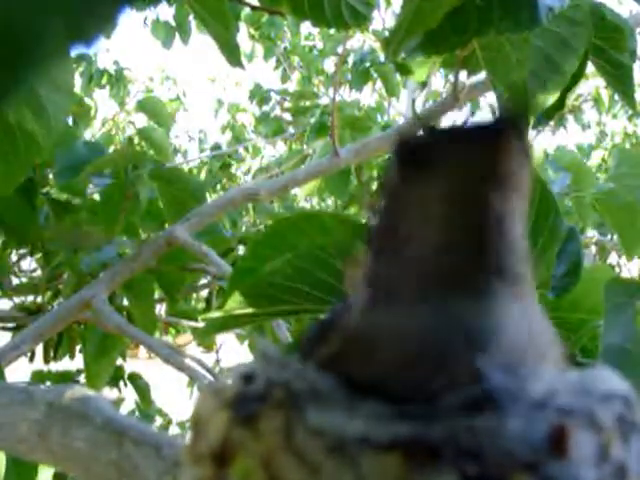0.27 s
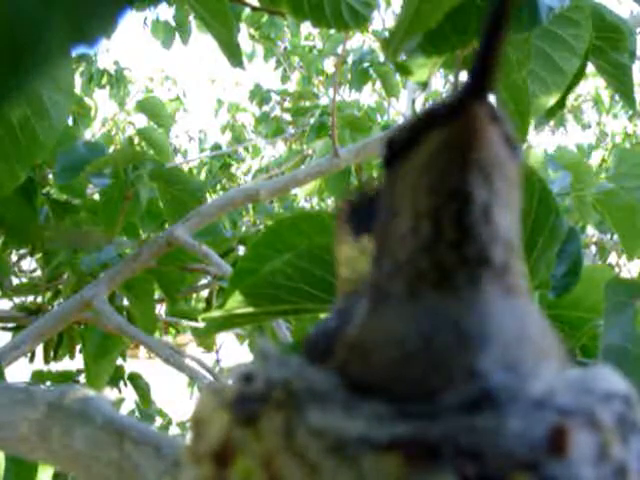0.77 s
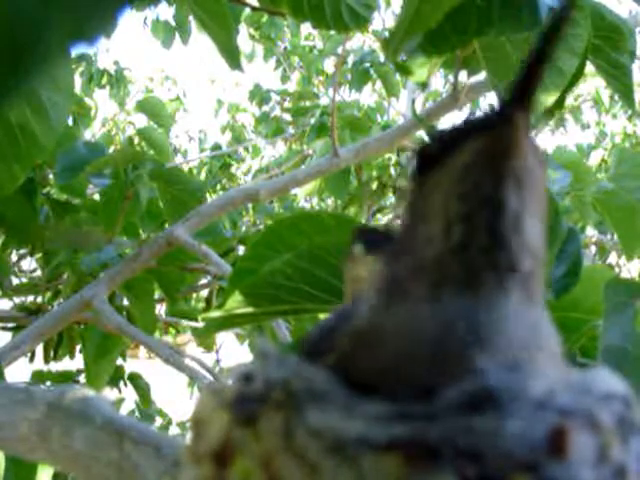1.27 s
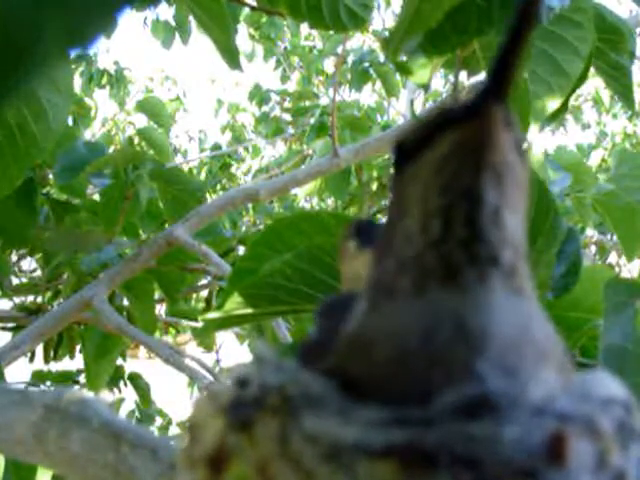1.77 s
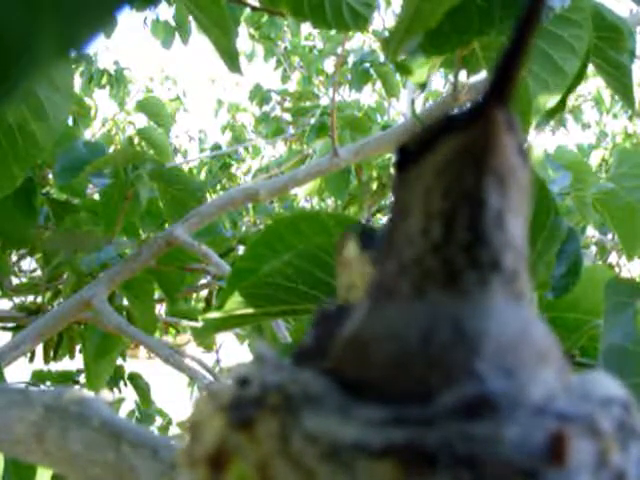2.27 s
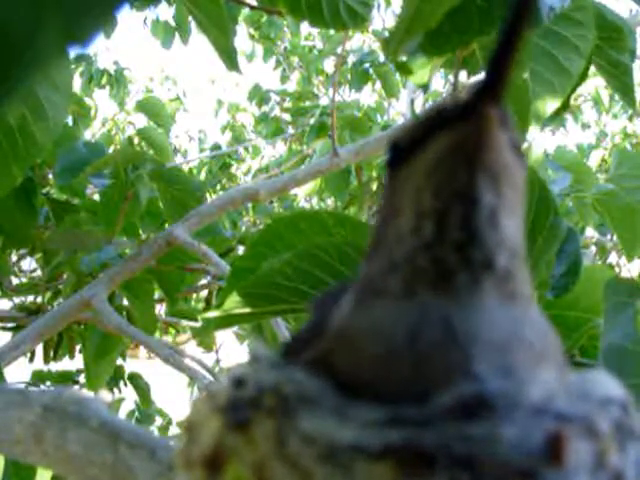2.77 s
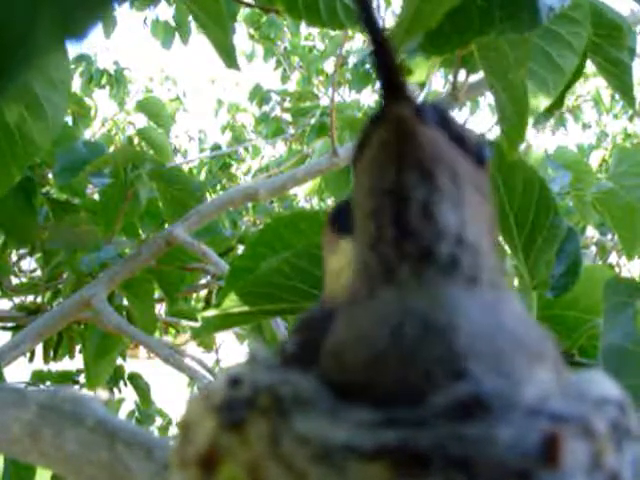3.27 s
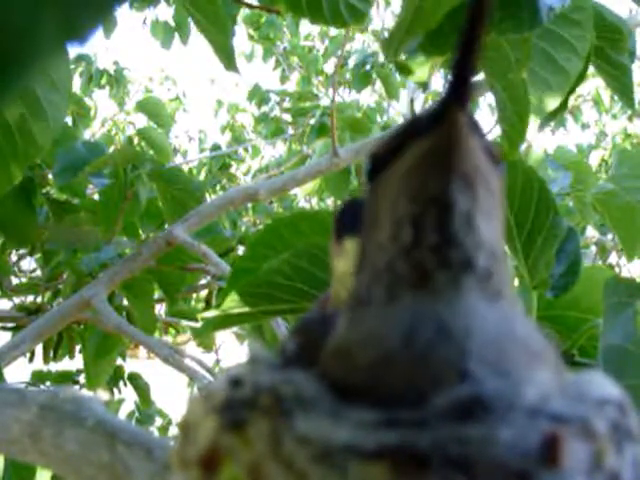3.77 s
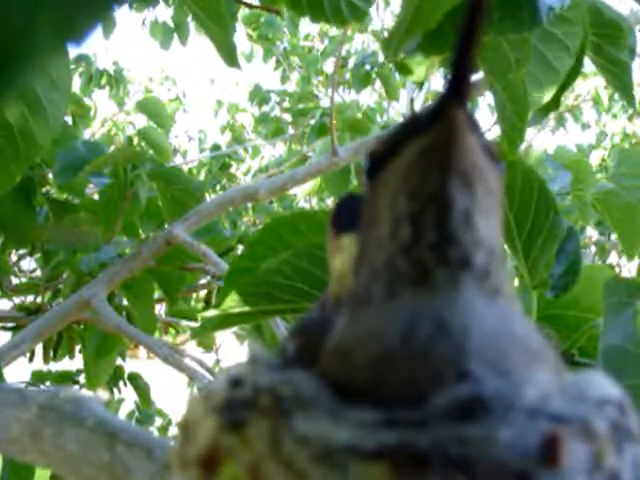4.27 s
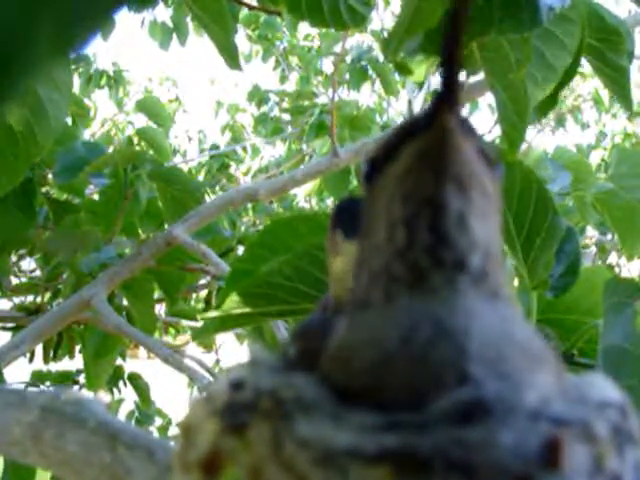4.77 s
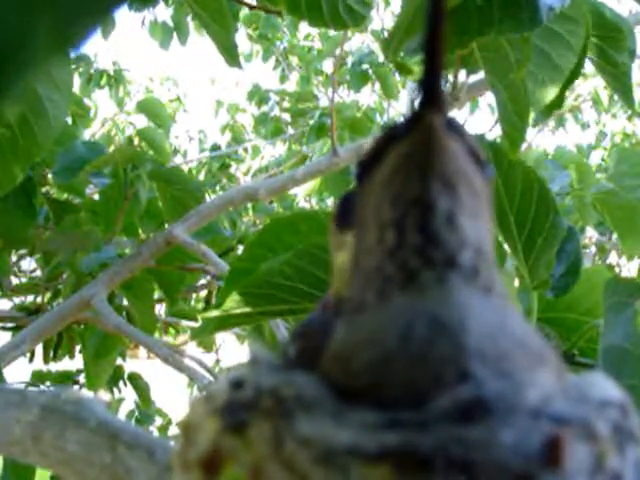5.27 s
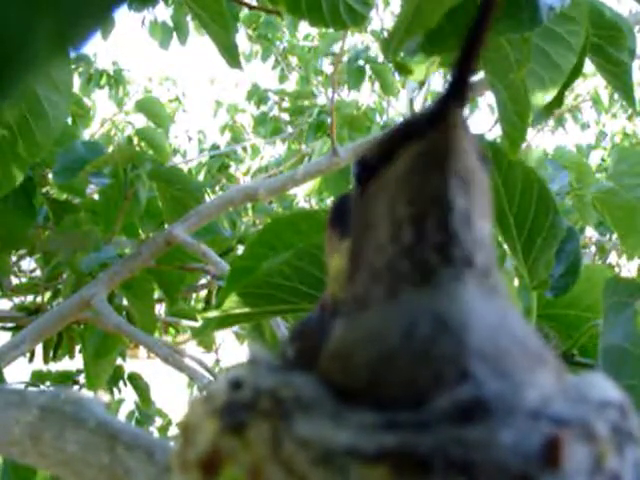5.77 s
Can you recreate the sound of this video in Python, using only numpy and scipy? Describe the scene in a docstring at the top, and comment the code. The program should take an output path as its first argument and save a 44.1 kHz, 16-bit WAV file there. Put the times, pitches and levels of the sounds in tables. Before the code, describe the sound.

Outdoors in a leafy garden tree, with a small camera almost touching a hummingbird's nest. From 0 to about 0.15 s, low, buffeting wingbeats thrum and fade quickly as the bird settles, with faint taps and a crisper click at 0.3 s. A sparrow-like bird nearby gives two hoarse, wavering chirps at 0.9 and 1.1 s, then a stronger one at 1.5. At 2.03 s the hummingbird makes one loud, dry, extremely short high tick, diving in pitch with a tiny knock; a faint far whistle falls just after. Clear arched chips follow at 2.1 and 2.4 s, the latter brightest. From 2.7 s, chips become softer and more frequent, about seven or eight a second from 3.2, mostly falling, with a longer one at 4.4. After 4.9 s they grow fainter and more echoey until 6 s. Faint hiss, thin whine and distant rumble persist, dipping slightly around 3 to 3.6 s.

```python
"""Hummingbird at its nest

A hummingbird settles in a leafy garden tree: periodic wing pressure fades, and later a swept tone gives one
tick. Two sparrow-like birds chirp, one near and clean, one farther off and raspier: two coupled gliding tones,
scattered by leaves and walls; a far bird whistles. Taps are decaying band-passed noise. A small camera near the
nest adds hiss, faint whine and mirror tones made by amplitude modulation, over a distant rumble of shaped
noise."""
import sys
import numpy as np
from scipy import signal
from scipy.fft import rfft, irfft
from scipy.io import wavfile
from scipy.ndimage import uniform_filter1d

SR = 44100
rng = np.random.default_rng(int(sys.argv[2]) if len(sys.argv) > 2 else 0)


def generate_wav(sig):
    """Save sig (samples, or channels by samples) to the path in sys.argv[1] as 16-bit PCM at SR."""
    pcm = np.round(np.clip(np.atleast_2d(sig).T, -1, 1) * 32767).astype(np.int16)
    wavfile.write(sys.argv[1], SR, pcm)


N = 266011
T = np.arange(N) / SR  # t/s

# Spectral shape of the distant rumble: f/Hz, relative level/dB
RUMBLE_SPECTRUM = [(20, 5), (55, 5), (80, -1.5), (120, -1.5), (250, 0), (340, -1), (500, 1.5), (800, -4),
                   (1150, -3.5), (1600, -10), (2500, -16), (4000, -40)]
# Spectral shape of the camera's hiss: f/Hz, relative level/dB
HISS_SPECTRUM = [(1200, -16), (2500, 5), (4200, 2), (6000, 5), (7200, 1.5), (9800, 1), (10200, -14),
                 (14000, -45), (15600, -19)]
# Mean level of the rumble, which dips midway: t/s, level/dB
RUMBLE_LEVEL = [(0, -55.5), (2.3, -55), (3.0, -56.5), (3.54, -58), (3.62, -53), (4.3, -55.5), (6.03, -56)]
# Mean level of the hiss, which dips midway: t/s, level/dB
HISS_LEVEL = [(0, -59.5), (2.8, -58.5), (2.95, -62), (3.5, -62.5), (3.62, -58.5), (6.03, -59)]
# Steady whines and narrow bands of hiss: f/Hz, nominal width/Hz (widened in use), level/dB
WHINE_BANDS = [(933, 7, -72), (2020, 89, -66.5), (2990, 124, -67.5), (4174, 120, -69.5), (7893, 160, -66),
               (12300, 93, -91)]
# Ripple of the camera's sampling clock: f/Hz, modulation depth/dB
CLOCK_RIPPLE = [(4020, -17.5), (8040, -20.5), (12060, -13), (16080, -23), (20100, -11)]
# Taps of feet, bill and twigs: t/s, onset level/dB, centre f/Hz, width of each filter pass/Hz, 1/e decay/s
NEST_TAPS = [(.094, -41.5, 2980, 6000, 0.0023), (.272, -50, 600, 1500, .012),
             (.303, -47, 1200, 2400, 0.0085), (.3065, -36, 2880, 1510, 0.0033),
             (1.657, -45.5, 930, 2200, 0.013), (2.031, -29, 950, 2000, 0.002),
             (2.924, -48.5, 69.7, 90, .02), (3.572, -47, 302, 1200, 0.017)]
# Chirps: start t/s, length/s, nominal top f/Hz, nominal bottom f/Hz, base level/dB,
# upper voice level/dB (re lower), echo level/dB (re direct), rasp/0-1, name of shape
CHIRPS = [ (0.874, 0.09, 4335, 2326, -42, -9, -3.5, .45, "warble"),
          (1.086, 0.11, 4235, 2300, -40, -5.5, -5, 0.43, "warble"),
          (1.458, 0.024, 3120, 2980, -59, -20, -3, .4, "slide"),
          (1.484, 0.073, 4376, 3210, -32, -13, -6, 0.39, "scoop"),
          (1.631, 0.033, 3120, 2920, -58.5, -20, -3, .4, "slide"),
          (2.072, 0.055, 3424, 2670, -34.5, 1, -12, 0.18, "arch"),
          (2.372, 0.054, 3520, 2720, -30, 0, -15, 0.13, "arch"),
          (2.663, 0.05, 4050, 3120, -40.5, -21, -4.5, 0.54, "hook"),
          (2.795, .067, 4394, 3346, -41, -9, -7, .4, "shoulder"),
          (3.155, 0.057, 3430, 2680, -44, -1.5, -5, 0.17, "arch"),
          (3.295, 0.059, 3980, 3030, -44.8, -10, -5, 0.43, "hook"),
          (3.418, .069, 4490, 3350, -45, -9, -4.5, 0.35, "shoulder"),
          (3.544, 0.065, 4480, 3950, -44, -12, -6.5, 0.54, "scoop"),
          (3.67, 0.068, 4540, 3525, -43.5, -28, -6.5, 0.36, "slide"),
          (3.811, 0.053, 5220, 4100, -44.8, -21, -4, 0.43, "slide"),
          (3.945, 0.076, 3765, 3060, -45, -17, -4, 0.53, "hold"),
          (4.067, 0.054, 3350, 2430, -50.5, -22, -1.5, 0.4, "slide"),
          (4.11, .040, 3030, 2690, -50.5, -20, -1, 0.3, "rise"),
          (4.226, 0.078, 3430, 2707, -49, -17, -4, 0.48, "hook"),
          (4.382, 0.15, 4286, 3196, -43, -28, -6, 0.31, "hold"),
          (4.598, 0.043, 3420, 2490, -49.5, -13, -6, 0.56, "slide"),
          (4.636, 0.043, 3780, 3320, -50.5, -17, -3, 0.35, "rise"),
          (4.730, 0.065, 4670, 3734, -47, -21, -3.5, 0.5, "hook"),
          (4.786, 0.048, 3990, 3080, -46, -21, -2.5, 0.25, "dive"),
          (4.936, 0.073, 3260, 2610, -54, -19, 0.5, 0.52, "hump"),
          (5.091, 0.077, 4580, 3170, -47, -28, -1.5, 0.33, "dive"),
          (5.244, .034, 3290, 2570, -55, -16, -6, .53, "slide"),
          (5.344, .052, 3800, 3100, -58, -20, 0, 0.46, "dive"),
          (5.439, 0.05, 3060, 2400, -53.5, -16, -5, .4, "dive"),
          (5.579, 0.077, 4400, 3200, -47, -27, -6, 0.3, "dive"),
          (5.771, 0.049, 3570, 3000, -52.5, -18, 0, 0.63, "dive"),
          (5.898, 0.026, 3020, 2290, -59.5, -16, -1, 0.5, "slide"), ]
# Gestures of the chirps, by name: share of length/0-1, pitch from bottom to top/0-1, level/dB (re base)
CHIRP_SHAPES = { "arch": [(0, 0.638, -19), (.16, .88, -6), (.32, 1, 0.5), (.56, .62, -1), (.74, .25, -6.5),
                (1, 0.0043, -16)], "slide": [(0, 1, -11), (.25, .88, 0.5), (.65, .45, -3.5), (1, 0, -4.5)],
                "dive": [(0, 0.83, -15), (.26, 0.98, -1), (.5, .5, -9), (1, 0, -4.5)],
                "hold": [(0, .92, -15), (.24, .88, -2), (.53, 1, 0), (.67, .3, -7.5), (1, 0.066, -7.5)],
                "hump": [(0, .1, -6), (.4, 1, 1.5), (.65, .7, -5), (1, 0, -4)], "shoulder": [(0, .97, -11),
                (.15, .85, -3), (.33, 1, -3.5), (.54, .78, 1), (.76, .3, -4), (1, 0, -10)],
                "rise": [(0, 0, -4), (.5, .6, -4), (1, 1, -16)], "hook": [(0, 0.47, -13), (.29, .55, -4.5),
                (.45, 1, -2), (.66, .12, -0.5), (1, 0.029, -20)], "scoop": [(0, 1, -18), (.2, 0.26, -5),
                (.37, 0.07, -1.5), (.52, .35, 0), (.64, 0.71, -12), (.75, 1, -4.5), (.85, 0.82, -5.5),
                (1, 0, -14)], "warble": [(0, .6, -13), (.15, .55, -3), (.25, .65, -4.5), (.36, 0.81, 1),
                (.48, 0.98, -3.5), (.62, .3, -5), (.69, .3, -3), (.81, .58, -4), (1, 0.013, -10.5)], }
# Flurries of wingbeats on landing, each weaker: middle t/s, strength/dB, half length to 1/e/s
WING_FLURRIES = [(0.024, -13, 0.023), (0.091, -19, 0.015), (.14, -26.5, 0.014)]
# Ring of the air pushed against nest and camera: f/Hz, width/Hz, relative level/dB
WING_RESONANCES = [(160, 17, 1), (235, 160, -6.5), (402, 280, -18)]

CUTOFF_HZ = 15750
ZERO_RASP_VOICE_GAP_HZ = 701.3
WHISTLE_S, WHISTLE_LENGTH_S, WHISTLE_DB, WHISTLE_FADE_DB_PER_S = 2.08, 0.22, -57, 50
# the whistle's pitch decays from its top toward its bottom with this time constant
WHISTLE_TOP_HZ, WHISTLE_BOTTOM_HZ, WHISTLE_SAG_S = 1857, 1520, 0.13
WINGBEAT_HZ = 52.77
TICK_S, TICK_DB, TICK_HALF_LENGTH_S = 2.033, -15, .0028
# the tick's pitch crests just before the loudest moment, then dives ever faster
TICK_TOP_HZ, TICK_BOTTOM_HZ, TICK_CREST_LEAD_S, TICK_DIVE_S = 8950, 3900, .0028, .0074


def undb(db):
    """Logarithmic level: 20 dB is a tenfold amplitude."""
    return 10 ** (np.asarray(db) / 20)


def unit(x):
    """Normalisation of mean power: the rms becomes 1."""
    return x / np.sqrt(np.mean(x ** 2))


def curve(rows, t):
    """Linear interpolation of each column against the first."""
    points, *columns = np.transpose(rows)
    return [np.interp(t, points, column) for column in columns]


def resonate(x, hz, width_hz):
    """Second-order resonance: unit gain at the centre."""
    b, a = signal.iirpeak(hz, hz / width_hz, fs=SR)
    return signal.lfilter(b, a, x)


def walk(rate, size):
    """Slow random fluctuation: straight lines join about rate random values a second."""
    steps = np.arange(size) * rate / SR
    return 1.49 * np.interp(steps, np.arange(4096), rng.standard_normal(4096))


def coloured(spectrum):
    """Spectral shaping: white noise takes the given spectrum on a log frequency axis, with rms 1."""
    hz, db = np.transpose(spectrum)
    f = np.maximum(np.arange(N // 2 + 1) * SR / N, 1)
    gain = undb(np.interp(np.log(f), np.log(hz), db))
    return unit(irfft(rfft(rng.standard_normal(N)) * gain, N))


def add(out, start, x):
    """Superposition: x joins the sum from its start time, in seconds."""
    i = max(int(start * SR), 0)
    out[i:i + len(x)] += x[:N - i]


def garden(x, first_s=0.0036, early_t60=0.22, late_t60=0.26, late_db=-16):
    """Multiple scattering: leaves and near walls return a quick cluster, then a faint longer tail."""
    t = np.arange(SR // 3) / SR
    early = undb(-60 * t / early_t60)
    late = undb(late_db - 60 * t / late_t60)
    onset = np.clip(t / first_s - 1, 0, 1)
    # cubing leaves a few strong reflections among many weak ones
    scatter = rng.standard_normal(len(t)) ** 3 * (early + late) * onset
    return signal.fftconvolve(x, scatter / np.linalg.norm(scatter))


def syrinx(hz, db, upper_db, rasp, waver, flutter_db):
    """Coupled oscillators: the second side of the syrinx sings a little higher and beats with the first."""
    n = len(hz)
    hz = uniform_filter1d(hz, size=n // 12, mode="nearest")
    hz = hz * (1 + waver * walk(416, n))
    gap_hz = ZERO_RASP_VOICE_GAP_HZ * (1 - 0.403 * rasp + 0.321 * rasp * walk(115.0, n))
    phase = 2 * np.pi * np.cumsum(hz) / SR
    beat = 2 * np.pi * np.cumsum(gap_hz) / SR
    # coupling adds a weak third tone one more gap up
    upper = undb(upper_db) * np.exp(1j * beat)
    voices = np.exp(1j * phase) * (1 + upper + 0.16 * upper ** 2)
    # unsteady membranes smear each tone into a hoarse band
    shake = (walk(799, n) + 1j * walk(800, n)) / np.sqrt(2)
    hoarse = (1 + rasp * shake) / np.sqrt(1 + rasp ** 2)
    swell = undb(db + flutter_db * walk(299.6, n)) * signal.windows.tukey(n, .08)
    return np.sqrt(2) * swell * np.imag(voices * hoarse)


def distant_rumble():
    """Sum of many remote sources: shaped noise from the town, wavering in level."""
    level_db = curve(RUMBLE_LEVEL, T)[0] + 0.5 * walk(14, N)
    return coloured(RUMBLE_SPECTRUM) * undb(level_db)


def camera_hiss():
    """Electronic noise: a broad random spectrum with a slightly wavering level."""
    level_db = curve(HISS_LEVEL, T)[0] + .5 * walk(24, N)
    return coloured(HISS_SPECTRUM) * undb(level_db)


def camera_whine():
    """Narrow-band noise: two resonances in cascade leave tone-like bands."""
    out = np.zeros(N)
    for hz, width, db in WHINE_BANDS:
        band = resonate(rng.standard_normal(N), hz, 2.4 * width)
        band = resonate(band, hz, 2.4 * width)
        out += undb(db) * unit(band)
    return out


def far_whistle():
    """Fully reverberant path: a far bird's falling, fading note arrives only as echo."""
    out = np.zeros(N)
    t = np.arange(int(WHISTLE_LENGTH_S * SR)) / SR
    hz = WHISTLE_BOTTOM_HZ + (WHISTLE_TOP_HZ - WHISTLE_BOTTOM_HZ) * np.exp(-t / WHISTLE_SAG_S)
    db = WHISTLE_DB - WHISTLE_FADE_DB_PER_S * t
    note = syrinx(hz, db, upper_db=-26, rasp=.1, waver=.005, flutter_db=2.5)
    add(out, WHISTLE_S, garden(note))
    return out


def taps():
    """Damped impact: exponentially decaying noise bands form knocks and scratches in nest and branches."""
    out = np.zeros(N)
    t = np.arange(SR // 8) / SR
    for s, db, hz, width, decay in NEST_TAPS:
        knock = resonate(rng.standard_normal(len(t)), hz, width)
        knock = resonate(knock, hz, width)
        add(out, s, undb(db) * np.exp(-t / decay) * unit(knock))
    return out


def songbird():
    """Direct and scattered paths: each chirp scales one gesture in time and pitch, then sounds by both."""
    out = np.zeros(N)
    for start, length, top_hz, bottom_hz, db, upper_db, echo_db, rasp, shape in CHIRPS:
        share = np.linspace(0, 1, int(length * SR))
        height, swell_db = curve(CHIRP_SHAPES[shape], share)
        hz = bottom_hz + (top_hz - bottom_hz) * height
        chirp = syrinx(hz, db + swell_db, upper_db, rasp, waver=0.026 * rasp, flutter_db=1.9)
        add(out, start, chirp)
        add(out, start, undb(echo_db) * garden(chirp))
    return out


def wings(first_s=0.00097, sharpness=16, swell_lead_s=0.002, eddy_db=-9, swish_db=-33):
    """Periodic pressure: each wingbeat pushes air, then sucks it back sharply, amid eddy and feather noise."""
    strength = sum(undb(db) * np.exp(-((T - s) / half) ** 2) for s, db, half in WING_FLURRIES)
    # an exponentiated cosine is a periodic pulse, narrower as its factor grows
    suction = np.exp(sharpness * (np.cos(2 * np.pi * WINGBEAT_HZ * (T - first_s)) - 1))
    push = np.exp(2.8 * (np.cos(2 * np.pi * WINGBEAT_HZ * (T - first_s + swell_lead_s)) - 1))
    puffs = strength * (0.39 * push - 1.22 * suction)
    hum = sum(undb(db) * resonate(puffs, hz, width) for hz, width, db in WING_RESONANCES)
    # noise spectra: f/Hz, relative level/dB
    eddies = coloured([(40, 1), (130, -3), (220, -4.0), (330, -7.5), (600, -18.0), (2000, -60)])
    feathers = coloured([(100, -7), (500, 4.0), (900, 0.5), (3000, -14.5), (9000, -11), (12000, -24)])
    swish = undb(swish_db) * (0.49 + suction) * feathers
    air = 0.13 * undb(eddy_db) * eddies + swish
    return hum + 0.51 * puffs + np.sqrt(strength) * air


def hummingbird_tick():
    """Frequency sweep: pitch crests and dives within one brief swell, so close that it is dry."""
    out = np.zeros(N)
    t = np.arange(-.007, .007, 1 / SR)
    dive = np.minimum(((t + TICK_CREST_LEAD_S) / TICK_DIVE_S) ** 2, 1)
    hz = TICK_TOP_HZ + (TICK_BOTTOM_HZ - TICK_TOP_HZ) * dive
    sweep = syrinx(hz, TICK_DB, upper_db=-16, rasp=.2, waver=.015, flutter_db=.4)
    swell = np.exp(-(t / TICK_HALF_LENGTH_S) ** 2)
    add(out, TICK_S + t[0], sweep * swell)
    return out


def scene():
    """Linear superposition: all sources add at one microphone."""
    background = distant_rumble() + camera_hiss() + camera_whine()
    nearby = far_whistle() + taps() + songbird()
    hummingbird = wings() + hummingbird_tick()
    return (background + nearby + hummingbird)[None]


def record(dry, jitter_db=-26):
    """Filtering and modulation: deep bass is lost, clock ripple adds sidebands, jitter a haze; the top is cut."""
    bass_cut = signal.butter(2, 38, "high", fs=SR, output="sos")
    treble_pass = signal.butter(2, 2000, "high", fs=SR, output="sos")
    top_cut = signal.ellip(10, .2, 80, CUTOFF_HZ, fs=SR, output="sos")
    sound = signal.sosfilt(bass_cut, dry)
    treble = signal.sosfilt(treble_pass, dry)
    # products with the treble give mirror tones at sum and difference frequencies
    ripple = sum(undb(db) * np.cos(2 * np.pi * hz * T) for hz, db in CLOCK_RIPPLE)
    jitter = undb(jitter_db) * coloured([(500, -8), (4000, 2), (9000, 1), (20000, -35)])
    return signal.sosfilt(top_cut, sound + (ripple + jitter) * treble)


dry = scene()
out = record(dry)
generate_wav(out)
```